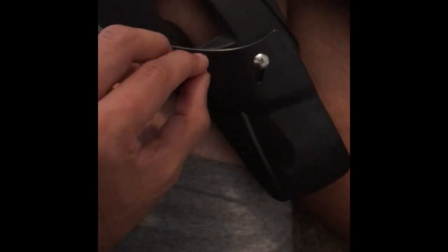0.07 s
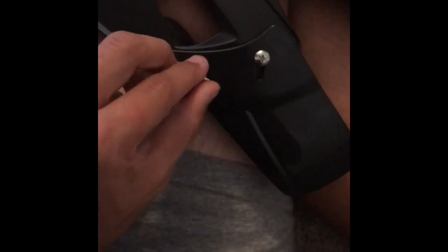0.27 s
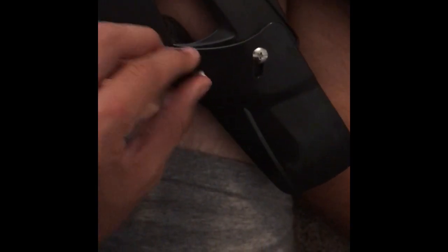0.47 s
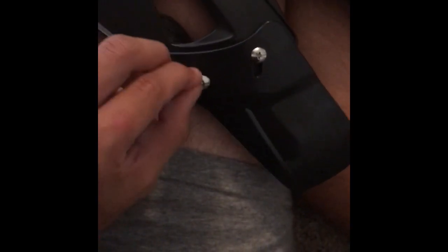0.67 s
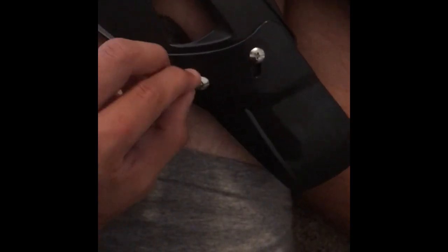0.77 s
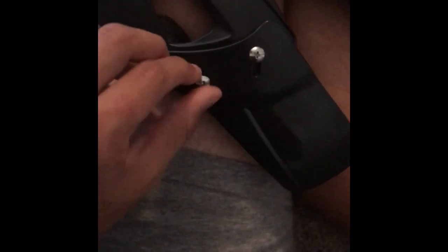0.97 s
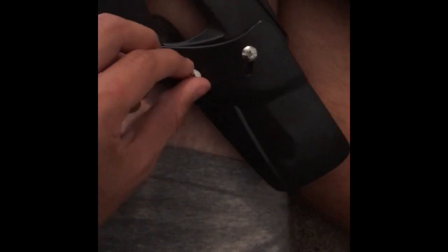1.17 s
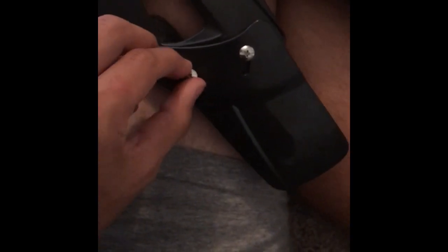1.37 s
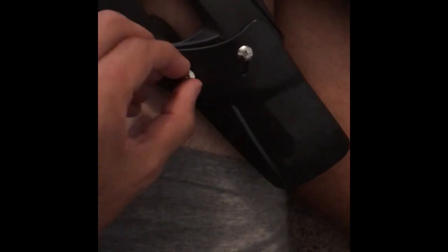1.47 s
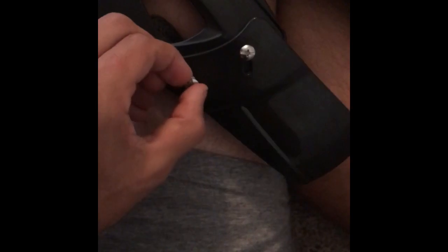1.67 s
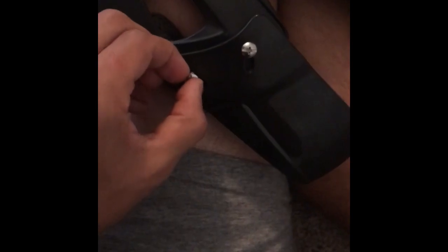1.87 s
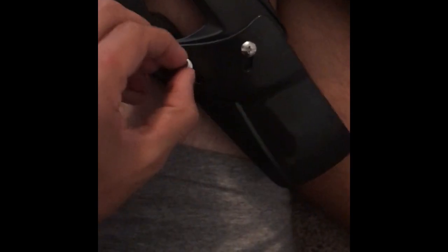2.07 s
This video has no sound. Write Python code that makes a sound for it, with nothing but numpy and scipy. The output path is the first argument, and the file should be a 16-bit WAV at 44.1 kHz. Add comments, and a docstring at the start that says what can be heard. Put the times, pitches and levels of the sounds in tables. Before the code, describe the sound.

A small metal screw clicks and rattles against a hard plastic helmet, ticks faintly, then snaps into place. Soft hand bumps follow. It is heard up close in a small room with a faint hum.

```python
"""Fitting a screw into a helmet

A small metal screw is pushed by hand into a hole in a hard plastic helmet, close by. It slides, clicks
and rattles against the rim, making the shell ring, then snaps into place. The hand bumps the helmet.
A small room answers faintly, over a low hum, a rumble and a hiss that rises after the loudest clicks."""
import sys
import numpy as np
from scipy import signal
from scipy.fft import rfft, irfft, next_fast_len
from scipy.io import wavfile
from scipy.ndimage import uniform_filter1d, map_coordinates

SR = 44100
rng = np.random.default_rng(int(sys.argv[2]) if len(sys.argv) > 2 else 0)


def generate_wav(sig):
    """Save sig (samples, or channels by samples) to the path in sys.argv[1] as 16-bit PCM at SR."""
    pcm = np.round(np.clip(np.atleast_2d(sig).T, -1, 1) * 32767).astype(np.int16)
    wavfile.write(sys.argv[1], SR, pcm)


N = 92610  # 2.1 seconds

# Each tap on the rim (time [s], shell level [dB], tick level [dB], treble level [dB], contact pitch [Hz])
RIM_TAPS = [(0.0555, -58.5, -78, -78, 1270), (.06, -59.5, -81, -89, 1260), (0.2081, -33, -41.5, -53, 3320),
            (.2128, -30.5, -20, -21.5, 6470), (0.218, -31, -20.5, -23, 4320),
            (0.229, -48, -40.5, -40, 4300), (0.275, -45.5, -44.5, -53, 3660), (0.3301, -46, -52, -70, 2600),
            (.333, -45.5, -41, -63, 3600), (0.3383, -50, -64, -57, 2900),
            (0.3408, -39.5, -34.5, -39.5, 5900), (0.5408, -84.5, -63, -60, 5600),
            (0.5879, -59, -66, -80, 3600), (.616, -36.5, -33.5, -50, 3600),
            (.6239, -39.5, -23, -39.5, 5600), (0.6389, -37.5, -30, -48, 5600),
            (.6442, -42.5, -42, -65, 5740), (0.6486, -44.5, -53, -78, 5700), (.658, -47, -41, -58, 5700),
            (0.6599, -42, -38.5, -39, 11400), (0.6743, -36, -25, -32.5, 5100),
            (.676, -36, -30.5, -31, 5160), (0.693, -39.5, -37, -49, 5700), (0.753, -51.5, -58.5, -66, 5700),
            (0.7728, -54.5, -56, -69.5, 5900), (0.7868, -54, -55.5, -71.5, 3800),
            (0.7893, -52, -70.5, -67.5, 1300), (.8864, -47, -51.5, -58, 1090),
            (.903, -60.5, -57.5, -69, 5660), (0.947, -56.5, -67, -78, 3800), (0.9539, -49, -50, -74, 5750),
            (1.0271, -55.5, -59.5, -70, 4100), (1.0391, -45, -44.5, -49.5, 1200),
            (1.079, -65, -72, -84, 3600), (1.094, -71, -73.5, -82, 3800), (1.1689, -54, -48.5, -64, 2370),
            (1.1973, -65.5, -55.5, -69.5, 5600), (1.205, -57, -51, -67, 3900),
            (1.2099, -54.5, -70, -76, 660), (1.2127, -55.5, -48, -57.5, 5600),
            (1.2432, -57, -60.5, -73, 3880), (1.2497, -58, -71, -81, 1285), (1.4097, -58, -55, -67, 3790),
            (1.696, -61, -69, -77.5, 3907), (1.7133, -57.5, -55.5, -71, 2900),
            (2.0131, -58.5, -62.5, -69, 1190), (2.0743, -49.5, -53.5, -63, 3380),
            (2.0892, -39, -40.5, -74, 3600), (2.0955, -55.5, -66, -57, 8800)]
# The notes a tap rings; wider ones die sooner (pitch [Hz], width [Hz], level [dB])
TAP_NOTES = [(290, 160, -12.5), (660, 110, -11), (1140, 110, -7.5), (1337, 160, 1.5), (1688, 220, -1.5),
             (2207, 220, -1), (2900, 800, -8), (3600, 200, 0), (4060, 350, -7.5), (5600, 450, 1),
             (6170, 550, -10.5), (8280, 1400, -6.5), (9930, 330, -9.5), (11260, 550, -5),
             (13300, 1000, -13.5), (14450, 500, -16.5)]
def taps():
    """The screw rattles around the hole. Each spot on the rim rings a little differently."""
    detune, spread_db = 0.025, 2.5
    out = np.zeros(N)
    for tap in RIM_TAPS:
        chance = rng.standard_normal((len(TAP_NOTES), 2))
        notes = [(hz * (1 + detune * a), width, db + spread_db * b)
                 for (hz, width, db), (a, b) in zip(TAP_NOTES, chance)]
        out += click(notes, *tap)
    return out


# The notes the seated screw and shell ring together (pitch [Hz], width [Hz], level [dB])
SNAP_NOTES = [(680, 42, -9), (1112, 92, -9), (1301, 100, 14.5), (1757, 260, 9.5), (2296, 174, 8.5),
              (3590, 230, -2), (3940, 550, -1), (5130, 900, -1), (6270, 740, -1), (9720, 1040, 4.5),
              (11020, 1100, 5.5), (11850, 600, 3), (12000, 300, -18), (15400, 1400, 4)]
def snap():
    """The screw snaps into place with one bright click."""
    return click(SNAP_NOTES, start_s=1.8337, shell_db=-28, tick_db=-21, treble_db=-21, contact_hz=6000)


def click(notes, start_s, shell_db, tick_db, treble_db, contact_hz):
    """One hit rings the helmet. Its low (shell), middle (tick) and treble parts each get a level."""
    lead = SR // 200  # samples of silence before the hit
    force = even_out(np.pad(gritty_hit(), (lead, 0)))
    ring = filtered(force, lambda f: shell_response(f, notes, contact_hz))
    shell_top_hz, tick_top_hz = 2800, 7500
    bands = [(lambda f: below(f, shell_top_hz), shell_db),
             (lambda f: below(f, tick_top_hz) - below(f, shell_top_hz), tick_db),
             (lambda f: 1 - below(f, tick_top_hz), treble_db)]
    out = np.zeros(N + SR)
    start = round(start_s * SR) - lead
    for band, db in bands:
        part = filtered(ring, band)
        strength = amp(db) * np.sqrt(0.005 * SR)  # as much energy as 5 ms at this level
        out[start:start + len(part)] += strength * part / np.linalg.norm(part)
    return out[:N]


def gritty_hit():
    """A clean knock, plus grit from the rough contact and duller echoes inside the helmet."""
    t = np.arange(SR // 10) / SR
    knock = t == 0
    echoes = filtered(burst(t, fade_s=0.023), lambda f: 1 / (1 + 1j * f / 2920))
    grit = burst(t, fade_s=0.0041)
    return knock + amp(-5) * grit + amp(-2) * echoes


def shell_response(f, notes, contact_hz):
    """How strongly, and how late, the struck shell gives out each frequency f."""
    def resonance(hz, width):
        return 1j * f * width / (hz * hz - f * f + 1j * f * width)

    body = sum(amp(db) * resonance(hz, width) for hz, width, db in notes)
    contact = amp(-0.5) * resonance(contact_hz, width=600)  # a short ring where the screw touches
    softening = below(f, 15700)  # the contact time rounds off the highest treble
    # Low notes travel slower as the shell bends, so each click trails downward.
    lag = np.exp(-2j * np.pi * 2.8 * np.log(f + 100))  # a delay of 2.8 / (f + 100) seconds
    weak_bass = amp(-4.5 * below(f, 960))  # the shell passes bass to the air poorly
    return (body + contact) * softening * lag * weak_bass


# The tone of the sliding screw (frequency [Hz], level [dB])
SLIDE_TONE = [(200, -15), (800, -12), (1300, -0.5), (2300, -4), (4000, -6.5), (6500, -17.5), (10000, -26.5),
              (16000, -35)]
def slide():
    """The screw slides into the first loud click: a scrape that swells fast, then stops."""
    end_s, end_db, rise_db_per_s = 0.209, -45, 512.5
    time_left = end_s - np.arange(N) / SR
    return noise(SLIDE_TONE) * amp(end_db - rise_db_per_s * abs(time_left)) * (time_left > 0)


# Each bump of the hand (time [s], pitch [Hz], strength [dB])
HAND_BUMPS = [(1.943, 64, -37.5), (1.989, 72, -43), (2.039, 61, -43)]
def hand():
    """The hand bumps the helmet, making soft, low thuds."""
    rise_s, fade_s = 0.012, 0.12
    out = np.zeros(N)
    for start_s, hz, db in HAND_BUMPS:
        t = np.maximum(np.arange(N) / SR - start_s, 0)
        loudness = 2 * amp(db - 60 * t / fade_s) * (1 - np.exp(-t / rise_s))
        out += loudness * np.sin(2 * np.pi * hz * t)
    return out


# How long the room's echo lasts (frequency [Hz], time to fade by 60 dB [s])
ECHO_FADE = [(200, 0.39), (1500, 0.29), (6000, 0.29), (15000, 0.21)]
# The tone of that echo (frequency [Hz], level [dB])
ECHO_TONE = [(150, 2.5), (300, 4.5), (600, -4.5), (1500, 4), (3500, -2), (6000, -4.5), (10000, -3),
             (16000, -6.5)]
def room(sound):
    """The small room answers with a smooth echo whose treble dies first."""
    blur_hz, build_s = 700.5, 0.0069
    # Sound leaving in all directions blurs the ringing notes.
    wander_hz = blur_hz * unit(uniform_filter1d(rng.standard_normal(N), size=24))
    blurred = np.real(signal.hilbert(sound) * np.exp(2j * np.pi * np.cumsum(wander_hz) / SR))
    hz, t, spectrum = signal.stft(rng.standard_normal(SR // 2), SR, nperseg=256)
    level_db = along(ECHO_TONE, hz)[:, None] - 60 * t / along(ECHO_FADE, hz)[:, None]
    build_up = 1 - np.exp(-t / build_s)
    tail = signal.istft(spectrum * amp(level_db) * build_up, SR, nperseg=256)[1]
    return signal.fftconvolve(blurred, tail / np.linalg.norm(tail))[:N]


# The low notes of the hum (pitch [Hz], level [dB])
HUM_NOTES = [(59.2, -63.5), (96.9, -63), (119.5, -69), (193.8, -81.5)]
def hum():
    """A low hum whose notes waver in loudness and pitch."""
    waver_db, drift_radians = 2.5, 0.38
    t = np.arange(N) / SR
    out = np.zeros(N)
    for hz, db in HUM_NOTES:
        loudness = amp(db + waver_db * wobble(2.4))
        phase = 2 * np.pi * (hz * t + rng.random()) + drift_radians * wobble(4.4)
        out += loudness * np.sqrt(2) * np.sin(phase)
    return out


# The tone of the room's rumble (frequency [Hz], level [dB])
RUMBLE_TONE = [(15, -39), (28, -14.5), (45, -2), (62, 1), (85, -5), (125, -4), (190, -14), (330, -15.5),
               (500, -27), (1000, -28.5), (2500, -69.5)]
def rumble():
    """The room rumbles, deep and steady."""
    return amp(-61.5) * noise(RUMBLE_TONE)


# The tone of the hiss (frequency [Hz], level [dB])
HISS_TONE = [(150, -21.5), (300, 4.5), (700, 2.5), (1500, -2.5), (3000, -5.5), (6000, -8), (8000, -10.5),
             (9050, -7), (10300, -11.5), (15000, -7.5), (16500, -16.5)]
# How loud the hiss is as time passes (time [s], level [dB])
HISS_LOUDNESS = [(0, -69.5), (.19, -72.5), (.23, -65.5), (.66, -59.5), (.82, -68.5), (1.3, -71.5),
                 (1.81, -71), (1.85, -66), (2.1, -58.5)]
def hiss():
    """A soft hiss rises during the rattle, sinks back, and rises again after the snap."""
    level_db = np.interp(np.arange(N) / SR, *np.transpose(HISS_LOUDNESS))
    return amp(level_db) * noise(HISS_TONE)


def amp(db):
    """Turn decibels into a number to multiply by."""
    return 10 ** (np.asarray(db) / 20)


def unit(x):
    """Scale a sound to an average power of 1."""
    return x / np.sqrt(np.mean(x ** 2) + 1e-30)


def along(points, hz):
    """Read between the rows of a (frequency, value) table, spaced by octaves."""
    f, values = np.transpose(points)
    return np.interp(np.log(hz + 1), np.log(f + 1), values)


def below(f, edge_hz, steepness=14):
    """Close to 1 below the edge, falling smoothly to 0 above it."""
    return 1 / (1 + (f / edge_hz) ** steepness)


def filtered(x, response):
    """Multiply each frequency in x by response(frequency)."""
    size = next_fast_len(len(x) + 8192)
    hz = np.fft.rfftfreq(size, 1 / SR)
    return irfft(rfft(x, size) * response(hz), size)[:len(x)]


def even_out(x, band_hz=1000):
    """Make all broad frequency bands equally strong, keeping the fine grain."""
    spectrum = rfft(x)
    power = abs(uniform_filter1d(abs(spectrum) ** 2, size=round(band_hz * len(x) / SR)))
    return irfft(spectrum / np.sqrt(power + 1e-12), len(x))


def noise(tone):
    """Steady noise, shaped by a tone table."""
    return unit(filtered(rng.standard_normal(N), lambda hz: amp(along(tone, hz))))


def wobble(rate):
    """A smooth curve through `rate` random values a second."""
    return map_coordinates(rng.standard_normal(64), [np.arange(N) * rate / SR], mode="wrap")


def burst(t, fade_s):
    """A puff of noise with energy 1 that drops 60 dB in fade_s."""
    puff = rng.standard_normal(len(t)) * amp(-60 * t / fade_s)
    return puff / np.linalg.norm(puff)


def scene():
    """Mix the screw, its faint echo, the hand and the background into one channel."""
    screw = slide() + taps() + snap()
    return (screw + amp(-21) * room(screw) + hand() + hum() + rumble() + hiss())[None]


def record(dry):
    """The recorder cuts off the very highest treble."""
    return filtered(dry[0], lambda f: below(f, 16150, steepness=130))[None]


dry = scene()
out = record(dry)
generate_wav(out)
```